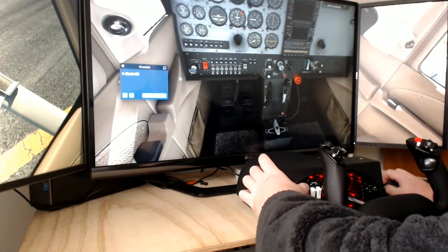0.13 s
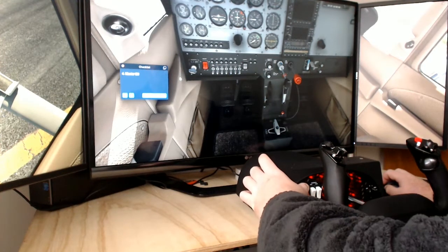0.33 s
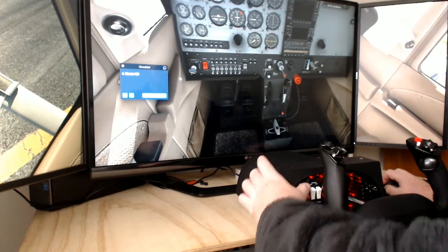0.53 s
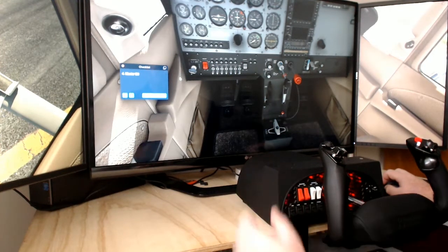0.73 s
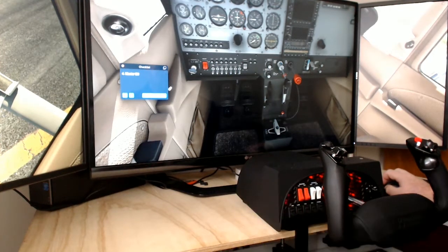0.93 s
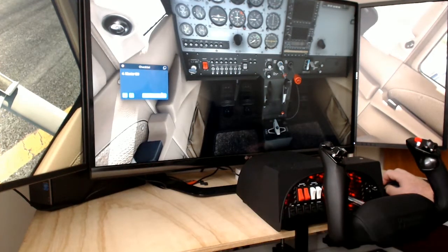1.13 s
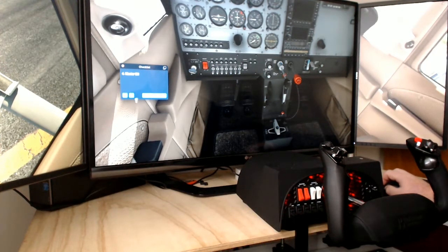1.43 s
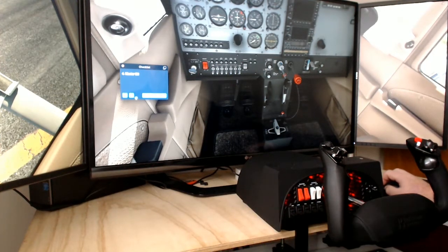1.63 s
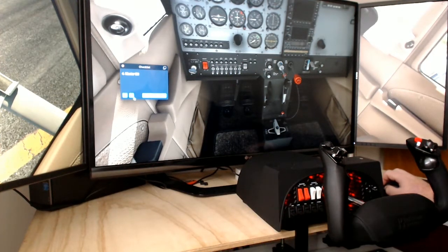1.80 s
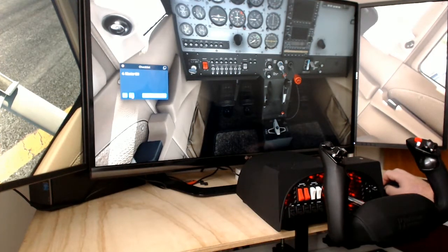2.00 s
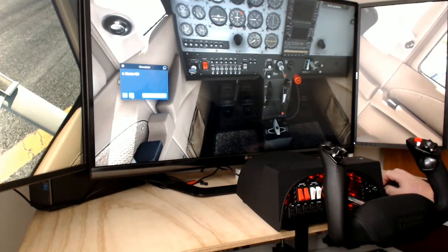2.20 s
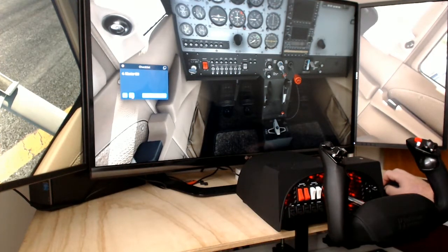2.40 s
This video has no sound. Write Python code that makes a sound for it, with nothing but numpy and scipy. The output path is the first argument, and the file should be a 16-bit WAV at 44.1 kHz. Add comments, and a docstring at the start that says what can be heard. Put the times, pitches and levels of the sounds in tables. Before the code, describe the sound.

A hard switch click on a plastic panel, followed by a softer knock in a quietly humming room

```python
"""Fans hum faintly from the start; then, in a small room, a toggle switch on a plastic panel is snapped over.
At a desk, close to the stereo microphones of a camera, the lever clatters against its stop, a finger
taps the case, then a duller knock rings case and desk top; a sleeve rustles as the arm draws back.
Each blow is decaying sines plus a noise burst, with a room tail of sparse random-sign echoes.
Fans are narrow noise bands over air hiss; the sleeve is a swell of shaped noise."""
import sys
import numpy as np
from scipy import signal
from scipy.fft import rfft, irfft
from scipy.io import wavfile
from scipy.ndimage import uniform_filter1d

SR = 44100
rng = np.random.default_rng(int(sys.argv[2]) if len(sys.argv) > 2 else 0)


def unload_wav(signal):
    """Save mono or channel-first audio to the path in sys.argv[1] as 16-bit WAV at rate SR, clipped to [-1, 1]."""
    wavfile.write(
        sys.argv[1],
        SR,
        np.round(np.clip(np.atleast_2d(signal).T, -1, 1) * 32767).astype(np.int16),
    )


def ratio(d):
    """dB to gain"""
    e = np.asarray(d, float) / 20
    return 10 ** e


N = 112454  # samples

# lever impacts against the stop: [t/s, level/dB, left minus right/dB]
LEVER_HITS = [(.2116, -29.5, 6), (.2130, -16.5, -8), (.2146, -16.5, 3.5), (.2158, -23, -2.5),
              (.2174, -21.5, 9), (.2187, -13, 1.5), (.2225, -22, 2), (.2385, -28, 2)]
# ringing modes of switch and panel, lowest a thud of the desk top: [f/Hz, level re hit/dB, t60/s]
SNAP_MODES = [(60.2, -4.5, 0.16), (189.3, -1, 0.13), (221.4, -3, 0.15), (275, 1, 0.098), (339.4, -1, 0.12),
              (480, -6.5, 0.092), (545, -8.5, 0.093), (727, -9.5, 0.051), (813, -9.5, 0.13),
              (1034, -11.5, 0.054), (1243, -5, 0.053), (1810, 0, 0.028), (2205, 2, 0.027),
              (3840, 2, 0.012), (4840, -11, 0.004), (5660, 4, 0.01), (6270, -7, 0.022)]
# noise colour of a lever impact: [f/Hz, relative density/dB per Hz]
LEVER_CRACK = [(100, -37.5), (200, -11), (900, -9.5), (1260, -7.5), (1500, -9.5), (2200, 0.5), (2760, -7.5),
               (4000, -0.5), (6500, -3.5), (7300, -6), (8200, -18), (11500, -20), (16000, -25)]
# light finger tap: [t/s, level/dB, left minus right/dB]
TAP_HITS = [(.364, -42, 6.5)]
# ringing modes under the finger: [f/Hz, level re hit/dB, t60/s]
TAP_MODES = [(702, 9, 0.048), (780, 7.5, 0.056), (1300, 0, 0.073)]
# noise colour of the tap: [f/Hz, relative density/dB per Hz]
TAP_NOISE = [(300, -30), (650, -1.5), (800, 1), (1050, -19), (2500, -21), (7000, -24), (8500, -35),
             (16000, -44)]
# knocks on the case: [t/s, level/dB, left minus right/dB]
KNOCK_HITS = [(.5872, -39.5, 4), (.5892, -27.5, 4), (.5930, -30.5, 0), (.5967, -30, 2), (.641, -42, -2.5)]
# ringing modes of case and desk top: [f/Hz, level re hit/dB, t60/s]
CASE_MODES = [(198, 2.5, 0.2), (222.5, -2.5, 0.26), (268.2, -3.5, 0.26), (854, -9.5, .1),
              (1047, 0.5, 0.046), (1091, -3, 0.15), (1261, 3, 0.18), (1302, -4, 0.1), (1564, -18, 0.13),
              (1980, -7.5, 0.046), (2966, -14, 0.031), (3590, -10, .04), (4940, -20, 0.054),
              (5710, -14.5, 0.054)]
# noise colour of a knock: [f/Hz, relative density/dB per Hz]
KNOCK_NOISE = [(150, -19.5), (360, -11.5), (580, -52.5), (1140, -2), (1760, -21), (3600, -28), (4100, -27),
               (5700, -21.5), (7300, -28), (8200, -34.5), (16000, -45.5)]
# decay of the room: [f/Hz, t60/s]
ROOM_T60 = [(150, .2), (400, 0.71), (1000, 0.26), (2800, 0.27), (7000, 0.25), (14000, .27)]
# starting spectrum of the room tail: [f/Hz, relative level/dB]
ROOM_TONE = [(150, -11), (400, -11), (1000, -2), (3000, 0), (8000, -1), (15000, 1.5)]
# likeness of left and right in room tail and rustle: [f/Hz, likeness -1..1]
ROOM_LIKENESS = [(150, 1), (400, 1), (1000, 1), (2000, 0.082), (5000, .05)]
# noise colour of the sleeve: [f/Hz, relative density/dB per Hz]
SLEEVE_COLOUR = [(300, -18), (620, 6.5), (800, 5), (1100, -10.5), (2000, -7.5), (6000, -17.5),
                 (12000, -36.5), (16000, -44)]
# fan tones: [f/Hz, half-amplitude width before levelling/Hz, rms level/dB]
FAN_TONES = [(33.07, 3.2, -59), (76, 2.7, -62.5), (155.4, 3.2, -59), (302, 9, -62), (330.9, 18, -62.5),
             (542, 9.8, -71), (1256, 4, -85.5), (5500, 3, -90), (6520, 26, -90), (6800, 10, -97.5)]
# noise colour of the air hiss: [f/Hz, relative density/dB per Hz]
HISS_COLOUR = [(12, -31), (22, -9.5), (45, -3), (90, -2.5), (127, -11), (250, -9), (400, -14), (560, -21),
               (640, -22.5), (780, -23), (1600, -29.5), (3500, -39), (6800, -41.5), (8500, -51),
               (11500, -56.5), (12500, -69), (16000, -74.5)]
# likeness of left and right in the hiss: [f/Hz, likeness -1..1]
HISS_LIKENESS = [(30, .93), (120, .94), (300, .9), (600, .75), (1000, .3), (1700, -.2), (2800, .1),
                 (5000, -.1), (8000, -.3), (15000, .1)]
# stereo balance of hiss, rustle and room tail: [f/Hz, left minus right/dB]
BALANCE = [(60, 2.0), (180, 2.0), (550, 1.5), (1650, 0.0), (4970, 2.0), (15000, 1.5)]

SNAP_CRACK_DB, KNOCK_CRACK_DB, TAP_CRACK_DB = 9, 7, 4  # noise level re hit, before its rise and fall
CRACK_RISE_S, CRACK_T60_S = 0.00017, 0.01
SNAP_RISE_CYCLES, KNOCK_RISE_CYCLES, TAP_RISE_CYCLES = 4.9, 0.7, 2.4  # build-up of each mode
SNAP_ROOM_DB, KNOCK_ROOM_DB = -1.5, -2.5  # send to the room; the tap shares the knock's
ROOM_START_S = 0.0022
RUSTLE_S, RUSTLE_RISE_S, RUSTLE_FALL_S, RUSTLE_DB = 1.06, 0.07, 0.39, -63  # peak time, 1/e times, level
FAN_STEADY = 0.48  # 0 = noisy flutter, 1 = constant level
FAN_LEAN_DB = 2.5  # left minus right
HISS_DB, PATCHY_DB = -52.5, 1.6  # rms level, rms depth of the drifting patches
CEILING, EDGE_HZ = 0.92, 16100  # overload ceiling (full scale = 1), low-pass edge


def lever_snap():
    """The lever's quick run of impacts, each ringing the switch and panel, with a low thud of the desk top."""
    return struck(LEVER_HITS, SNAP_MODES, LEVER_CRACK, SNAP_CRACK_DB, SNAP_RISE_CYCLES)


def case_knock():
    """Duller blows that ring the modes of the case and desk top."""
    return struck(KNOCK_HITS, CASE_MODES, KNOCK_NOISE, KNOCK_CRACK_DB, KNOCK_RISE_CYCLES)


def finger_tap():
    """One light touch that rings a few modes."""
    return struck(TAP_HITS, TAP_MODES, TAP_NOISE, TAP_CRACK_DB, TAP_RISE_CYCLES)


def struck(hits, modes, crack, crack_db, rise_cycles):
    """Every hit rings the decaying modes and adds a short burst of coloured noise."""
    t = np.arange(SR // 2) / SR
    out = np.zeros((2, N))
    hz, db, t60 = np.transpose(modes)[:, :, None]
    decay = ratio(db - 60 * t / t60)
    rise = (1 - np.exp(-t * hz / rise_cycles)) ** 2
    ring = (decay * rise * np.sin(2 * np.pi * hz * t)).sum(0)
    colour = ratio(read(crack, np.fft.rfftfreq(len(t), 1 / SR)))
    puff = ratio(crack_db - 60 * t / CRACK_T60_S) * (1 - np.exp(-t / CRACK_RISE_S))
    for hit_s, hit_db, lean_db in hits:
        white = rng.standard_normal((2, len(t)))
        noise = evened(irfft(rfft(white) * colour, len(t)))
        at = round(hit_s * SR)
        gains = ratio(hit_db) * sides(lean_db)[:, None]
        out[:, at:at + len(t)] += gains * (ring + puff * noise)
    return out


def room(x):
    """Sparse echoes of random sign, each band dying at its own speed, bass alike in both channels."""
    taps = np.zeros((2, SR // 2))
    # one echo per channel at a random place in every 20 samples
    start = np.arange(round(ROOM_START_S * SR), SR // 2 - 20, 20)
    at = start + rng.integers(0, 20, (2, len(start)))
    np.put_along_axis(taps, at, rng.choice([-1., 1.], at.shape), 1)
    hz, t, z = signal.stft(taps, SR, nperseg=256)
    z = pair(z, read(ROOM_LIKENESS, hz))
    z *= ratio(-60 * t / read(ROOM_T60, hz)[:, None])
    z *= sides(read(BALANCE, hz))[:, :, None] * ratio(read(ROOM_TONE, hz))[:, None]
    tail = signal.istft(z, SR, nperseg=256)[1]
    tail[:, :start[0]] = 0
    tail = tail / np.linalg.norm(tail[0])  # unit energy on the left
    return signal.fftconvolve(x, tail, axes=1)[:, :N]


def sleeve():
    """A soft swell of cloth noise, quick to rise and slower to fall."""
    t = np.arange(N) / SR - RUSTLE_S
    swell = np.exp(-(t / np.where(t < 0, RUSTLE_RISE_S, RUSTLE_FALL_S)) ** 2)
    return ratio(RUSTLE_DB) * swell * shaped(SLEEVE_COLOUR, ROOM_LIKENESS, patchy_db=0.0)


def fans():
    """Air hiss plus narrow noise bands: tones that waver in pitch and a little in level."""
    hz = np.fft.fftfreq(N, 1 / SR)
    white = np.fft.fft(rng.standard_normal(N))
    tones = np.zeros(N)
    for f, width, db in FAN_TONES:
        band = np.fft.ifft(white / (1 + ((hz - f) / width * 2) ** 2))
        envelope = abs(band) + 1e-12
        steadied = band / envelope ** np.clip(FAN_STEADY, 0, 1)
        tones += ratio(db) * evened(steadied.real)
    hiss = ratio(HISS_DB) * shaped(HISS_COLOUR, HISS_LIKENESS, PATCHY_DB)
    return hiss + sides(FAN_LEAN_DB)[:, None] * tones


def shaped(table, same, patchy_db):
    """Two channels of noise from random short-time spectra with drifting patches, at rms 1."""
    frames, hz = N // 512 + 5, np.fft.rfftfreq(2048, 1 / SR)
    a, b, c, d, patches = rng.standard_normal((frames, len(hz), 5)).T
    patches = uniform_filter1d(patches, size=20, axis=0)  # spread over frequency
    patches = evened(uniform_filter1d(patches, size=6, axis=1))  # spread over time
    z = pair([a + 1j * b, c + 1j * d], read(same, hz))
    z = z * sides(read(BALANCE, hz))[:, :, None]
    z *= ratio(read(table, hz)[:, None] + patchy_db * patches)
    return evened(signal.istft(z, nperseg=2048, noverlap=1536)[1][:, :N])


def pair(z, same):
    """Makes the second of two spectra resemble the first."""
    same = np.clip(same, -1, 1)[:, None]
    return np.array([z[0], same * z[0] + np.sqrt(1 - same ** 2) * z[1]])


def sides(lean_db):
    """Left and right gains for a left-minus-right lean in dB."""
    return np.array([ratio(lean_db / 2), ratio(-lean_db / 2)])


def read(points, hz):
    """Reads a spectrum table on a log-frequency axis."""
    f, value = np.transpose(points)
    return np.interp(np.log(hz + 1), np.log(f + 1), value)


def evened(x):
    """Scales to rms 1."""
    return x / np.sqrt(np.mean(x ** 2) + 1e-20)


def scene():
    """Switch, knock and tap, close and in the room, over fans and sleeve."""
    snap = lever_snap()
    knock = case_knock() + finger_tap()
    tail = room(ratio(SNAP_ROOM_DB) * snap + ratio(KNOCK_ROOM_DB) * knock)
    return snap + knock + tail + fans() + sleeve()


def roll_off(x):
    """The treble ends steeply here."""
    return signal.sosfilt(signal.butter(12, 16430, fs=SR, output="sos"), x)


def record(dry):
    """The camera's soft overload and band limit."""
    soft = dry / (1 + (abs(dry) / CEILING) ** 4) ** 0.25
    edge = signal.firwin(127, EDGE_HZ, window=("kaiser", 8), fs=SR)[None]
    mix = signal.oaconvolve(soft, edge, "same")
    return roll_off(mix)


dry = scene()
out = record(dry)
unload_wav(out)
```